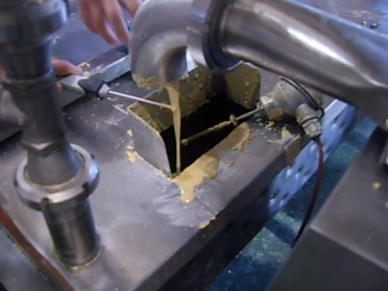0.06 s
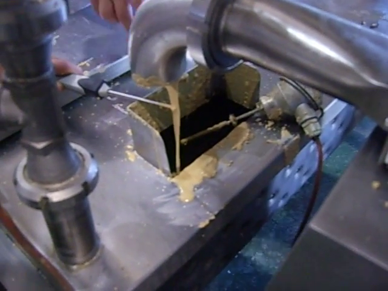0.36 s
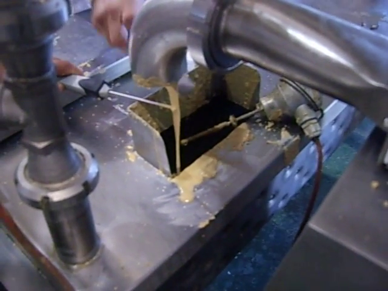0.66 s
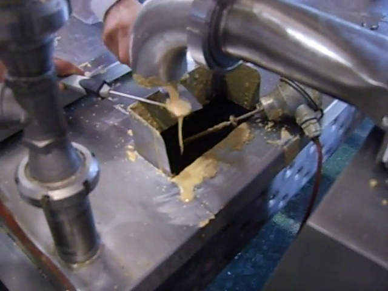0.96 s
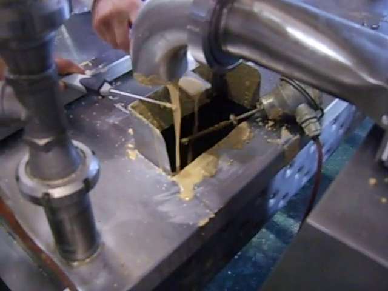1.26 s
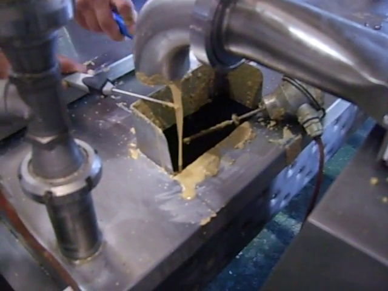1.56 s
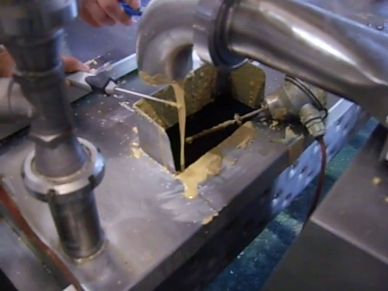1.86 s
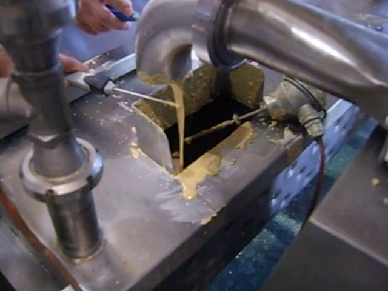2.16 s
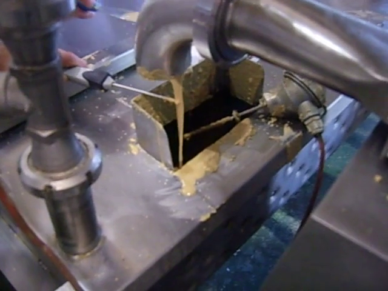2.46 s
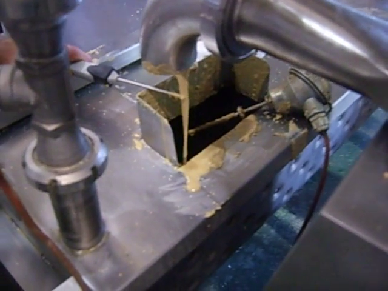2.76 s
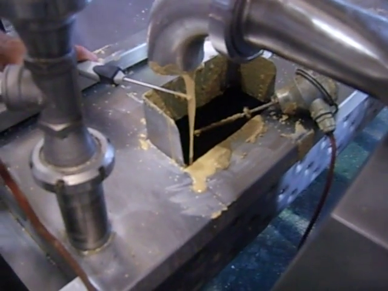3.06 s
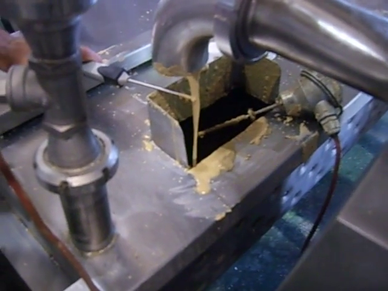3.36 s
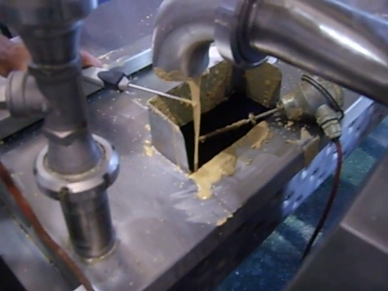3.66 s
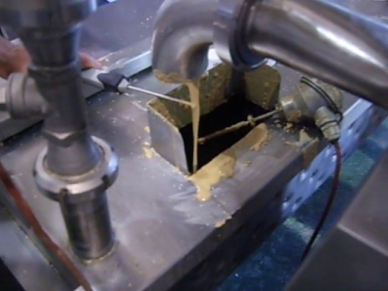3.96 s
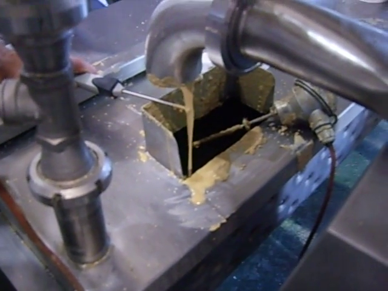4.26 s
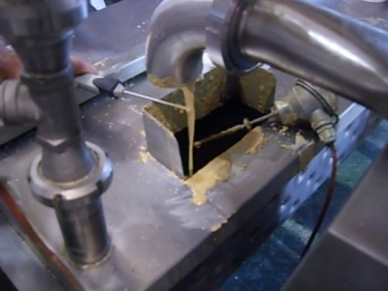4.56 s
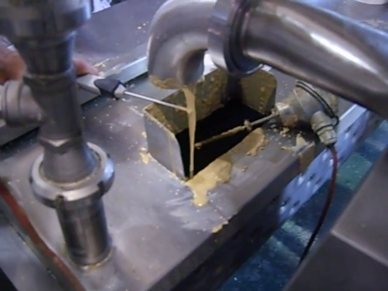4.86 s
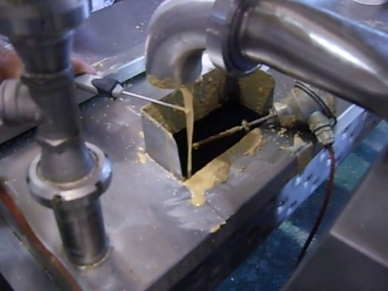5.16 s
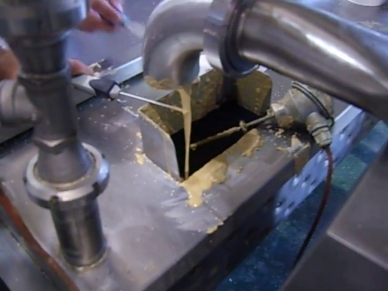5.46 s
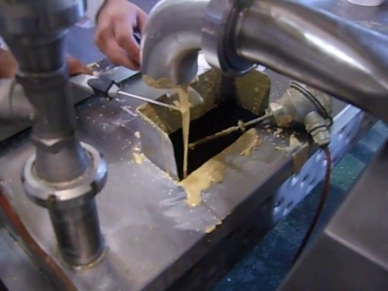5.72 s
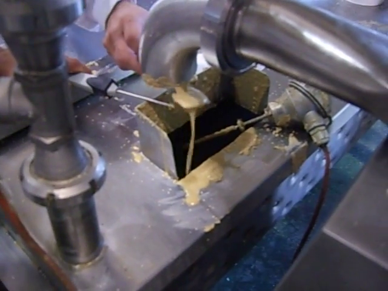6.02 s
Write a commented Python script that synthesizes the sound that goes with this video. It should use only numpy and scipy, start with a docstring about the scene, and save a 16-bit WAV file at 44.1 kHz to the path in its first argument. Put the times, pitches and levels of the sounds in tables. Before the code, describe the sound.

Close to a steel food-processing mill in an industrial room, a loud, even machine hum continues throughout. The load inside makes a steady roar and hiss, while the motor whines and the gears drone on one pitch. The tones fade and swell a little without changing speed. Four light ticks on steel and two small squeaks are barely heard above the machinery.

```python
"""A wet grinding mill in a factory hall

The mill runs at a steady speed, heard from close by its outlet. The rotor hums, the motor whines and
the gears drone, while the load churning inside roars and rattles against the steel. Echoes make loud
and quiet spots in the hall (standing waves), so tones swell and fade as the microphone drifts through
them. A few faint ticks and squeaks come through."""
import sys
import numpy as np
from scipy import signal
from scipy.fft import rfft, irfft
from scipy.io import wavfile

SR = 44100
rng = np.random.default_rng(int(sys.argv[2]) if len(sys.argv) > 2 else 0)


def to_wav(s):
    """Save 16-bit WAV."""
    ch = np.atleast_2d(s).T  # columns
    pcm = np.round(np.clip(ch, -1, 1) * 32767)  # PCM
    wavfile.write(sys.argv[1], SR, pcm.astype(np.int16))


N = 268557
TIME = np.arange(N) / SR
FREQUENCIES_HZ = np.fft.rfftfreq(N, 1 / SR)
ROTOR_HZ, MOTOR_HZ = 47.95, 49.518  # shaft turns per second

# The loud and quiet spots that the microphone drifts through. Columns: time_s, gain_db
STANDING_WAVES = [(0, 4.5), (0.35, -8), (0.6, -3.5), (1.0, -11), (1.3, -1.8), (1.9, -4.7), (3.25, 3),
                  (3.8, 0.5), (6.09, 1.4)]


def gain(db):
    """Turns decibels into a number to multiply a sound by."""
    return 10 ** (np.asarray(db) / 20)


def normalise(sound):
    """Scales a sound so that its average strength (rms) is 1."""
    return sound / np.sqrt(np.mean(abs(sound) ** 2) + 1e-20)


def gain_curve(points):
    """Joins rows of time_s, level_db into a gain for every sample."""
    return gain(np.interp(TIME, *np.transpose(points)))


def shape_spectrum(sound, spectrum):
    """Filters a sound by rows of pitch_hz, relative_db, then scales it to strength 1."""
    pitch_hz, relative_db = np.transpose(spectrum)
    curve_db = np.interp(np.log(FREQUENCIES_HZ + 1), np.log(pitch_hz), relative_db)
    return normalise(irfft(rfft(sound) * gain(curve_db), N))


def drift(rate_hz, points=512):
    """A slow random wobble of strength 1 that changes up to about rate_hz times a second."""
    hz = np.fft.rfftfreq(points, TIME[-1] / points)
    slow = irfft(rfft(rng.standard_normal(points)) * (hz > 0) / (1 + (hz / rate_hz) ** 2))
    return np.interp(TIME, np.linspace(0, TIME[-1], points), normalise(slow))


def tone(cycles, waver, rate_hz):
    """A tone, given its running count of cycles; hall echoes slowly shift its level and phase."""
    phase = 2 * np.pi * (cycles + rng.random())
    main = (1 + waver * drift(rate_hz)) * np.cos(phase)
    shifted = waver * drift(rate_hz) * np.sin(phase)
    return np.sqrt(2) * (main + shifted) / np.sqrt(1 + 2 * waver ** 2)


def shaft_turns(speed_hz, wander):
    """Counts the turns of a shaft whose speed wanders a little with the load."""
    return np.cumsum(speed_hz * (1 + wander * drift(0.58))) / SR


def rotor_hum():
    """The rotor hums at six times its turning speed, with weaker tones at other multiples."""
    # Level of the main hum, whose long waves swell and fade slowly. Columns: time_s, level_db
    hum_levels = [(0, -20.5), (1.5, -17.5), (3.55, -16.0), (3.9, -17.5), (5.25, -14), (5.7, -17.4),
                  (6.09, -16.5)]
    # The rotor's weaker tones. Columns: cycles_per_turn, level_db
    weak_tones = [(3, -35), (4, -31), (12, -36.5)]
    turns = shaft_turns(ROTOR_HZ, wander=0.00016)
    hum = tone(6 * turns, waver=0.075, rate_hz=6)
    others = sum(gain(db) * tone(multiple * turns, waver=0.049, rate_hz=6.3)
                 for multiple, db in weak_tones)
    return gain_curve(hum_levels) * hum + others


def motor_whine(swap_s=2.75, swap_ease_s=0.35):
    """The motor whines at multiples of its speed; midway, the shrillest fades as a whistle rises."""
    # Motor tones, bunched near the rates at which slots and fan blades pass.
    # Columns: cycles_per_turn, level_db
    motor_tones = [(1, -50), (2, -45), (19, -46), (20, -42), (21, -44), (34, -56), (35, -51), (36, -53.5),
                   (37, -51), (40, -51.5), (55, -49.5), (56, -53.5), (57, -51.5), (75, -43.5), (76, -53),
                   (94, -67), (114, -59)]
    turns = shaft_turns(MOTOR_HZ, wander=0.0001)
    whine, whistle, shrill = (tone(multiple * turns, waver=0.15, rate_hz=4) for multiple in (38, 95, 133))
    whine *= gain(-40.5) * gain_curve(STANDING_WAVES) ** 0.55  # a power below 1 softens the swells
    # As the microphone moves, the shrillest tone gives way to a lower whistle.
    swapped = 0.5 + 0.5 * np.tanh((TIME - swap_s) / swap_ease_s)  # rises from 0 to 1
    whistle *= gain(-52 - 13 * (1 - swapped))
    shrill *= gain(-55.5 - 8 * swapped)
    others = sum(gain(db) * tone(multiple * turns, waver=0.4, rate_hz=8.1)
                 for multiple, db in motor_tones)
    return whine + whistle + shrill + others


def gear_drone(drone_hz=598.3):
    """Meeting gear teeth make one strong tone, among many weaker ones that swell less."""
    # Tones of the gears, pump and nearby drives. Columns: pitch_hz, level_db (before the swell)
    machine_tones = [(24.6, -58.5), (45, -51.5), (66.8, -47.5), (133.7, -44.5), (175.3, -46.5),
                     (242.7, -30.5), (248.9, -34.5), (299.9, -28.5), (332.3, -33), (351.3, -31),
                     (379.9, -36), (398, -33), (467, -39), (637, -30.5), (732.6, -30), (759.2, -30.5),
                     (865, -41), (1196.8, -45.5), (5981, -65.5)]
    swell = gain_curve(STANDING_WAVES)
    drone = gain(-20.5) * tone(drone_hz * TIME, waver=0.039, rate_hz=3)
    others = sum(gain(db) * tone(hz * TIME, waver=0.27, rate_hz=2) for hz, db in machine_tones)
    return swell * drone + swell ** 0.19 * others


def chamber_roar():
    """The churning load roars and makes the housing ring; this broad sound barely swells or fades."""
    # How the grinding chamber's roar spreads from low to high. Columns: pitch_hz, relative_db
    roar_spectrum = [(20, -33), (36, -24), (50, -9), (72, -16), (110, -10), (160, -8), (260, -0.5),
                     (370, -0.5), (480, -2.5), (700, 0), (860, -3.5), (1040, -11.5), (1400, -19.5),
                     (4000, -56.5)]
    # Where the housing and pipes ring. Columns: pitch_hz, width_hz, level_db (before the swell)
    resonances = [(198.9, 10, -36.5), (350.3, 26, -33), (410, 40, -35.5), (512, 9.5, -42.5),
                  (621.7, 15, -33), (1139, 60, -40), (2768, 110, -44.5), (3756, 45, -47), (3920, 26, -56.5),
                  (5530, 110, -57.5)]
    roar = gain(-17.5) * shape_spectrum(rng.standard_normal(N), roar_spectrum)
    for pitch_hz, width_hz, level_db in resonances:
        off_pitch = (FREQUENCIES_HZ - pitch_hz) / (width_hz * np.sqrt(2))
        ring = irfft(rfft(rng.standard_normal(N)) / (1 + 2j * off_pitch) ** 2, N)
        roar += gain(level_db) * normalise(ring)
    swell = gain_curve(STANDING_WAVES) ** 0.041
    return roar * swell * gain(0.29 * drift(4.2))


def load_rattle(impacts_per_s=30000, throb_depth=0.05):
    """Countless tiny impacts blend into a hiss that throbs slightly with each turn of the motor."""
    # The fine rattle of the load against the steel. Columns: pitch_hz, relative_db
    rattle_spectrum = [(500, -13.5), (1250, -2), (1400, 2), (1750, -1.5), (2250, 1.5), (2800, -1.5),
                       (3200, -5.5), (3600, -4), (4100, -11.5), (4600, -16), (5500, -14), (6750, -17),
                       (7050, -24.5), (7400, -49)]
    impacts = rng.standard_normal(N) * (rng.random(N) < impacts_per_s / SR)
    throb = 1 + throb_depth * np.cos(2 * np.pi * MOTOR_HZ * TIME)
    hiss = shape_spectrum(impacts * throb, rattle_spectrum)
    return gain(-28) * hiss * gain(0.16 * drift(9))


def add_at(track, start_s, sound):
    """Mixes a sound into the track, starting at start_s."""
    part = track[round(start_s * SR):][:len(sound)]
    part += sound[:len(part)]


def steel_ticks(fade_s=0.007):
    """Each tick on the steel is a bright burst of noise that drops 60 dB in fade_s."""
    # Ticks on the steel. Columns: start_s, peak_db
    ticks = [(1.558, -21.5), (1.958, -23.5), (3.058, -24), (4.960, -25)]
    track = np.zeros(N)
    t = TIME[:SR // 20]
    bright_band = signal.butter(4, [4000, 6500], "band", fs=SR, output="sos")
    for start_s, peak_db in ticks:
        burst = rng.standard_normal(len(t)) * gain(-60 * t / fade_s)
        tick = signal.sosfilt(bright_band, burst)
        add_at(track, start_s, gain(peak_db) * tick / abs(tick).max())
    return track


def faint_squeaks():
    """Each squeak is a brief pure tone that fades in and out."""
    # The squeaks. Columns: start_s, length_s, pitch_hz, peak_db
    squeaks = [(2.04, 0.097, 1790, -29), (2.034, 0.073, 2100, -40), (3.589, 0.053, 1560, -25.5)]
    track = np.zeros(N)
    for start_s, length_s, pitch_hz, peak_db in squeaks:
        t = np.arange(0, length_s, 1 / SR)
        fade = np.sin(np.pi * t / length_s)
        add_at(track, start_s, gain(peak_db) * fade * np.sin(2 * np.pi * pitch_hz * t))
    return track


def scene():
    """All the sounds of the mill, added into one channel."""
    running = rotor_hum() + motor_whine() + gear_drone() + chamber_roar() + load_rattle()
    return (running + steel_ticks() + faint_squeaks())[None]


def record(dry, cutoff_hz=7380):
    """A soft limiter rounds off the tallest peaks, then a steep filter cuts treble above the hiss."""
    rounded = dry / (1 + dry ** 12) ** (1 / 12)
    low_pass = signal.firwin(801, cutoff_hz, window=("kaiser", 9), fs=SR)
    return signal.oaconvolve(rounded, low_pass[None], "same", axes=1)


dry = scene()
out = record(dry)
to_wav(out)
```